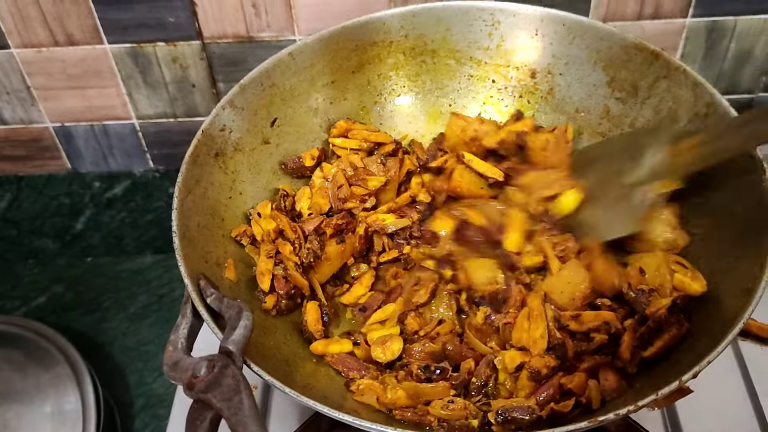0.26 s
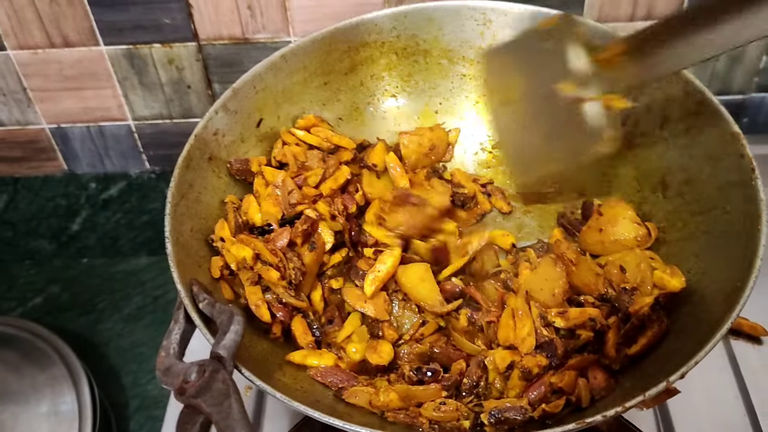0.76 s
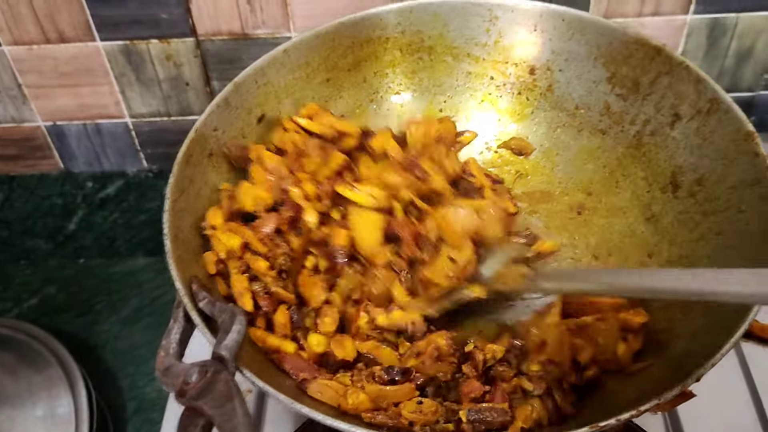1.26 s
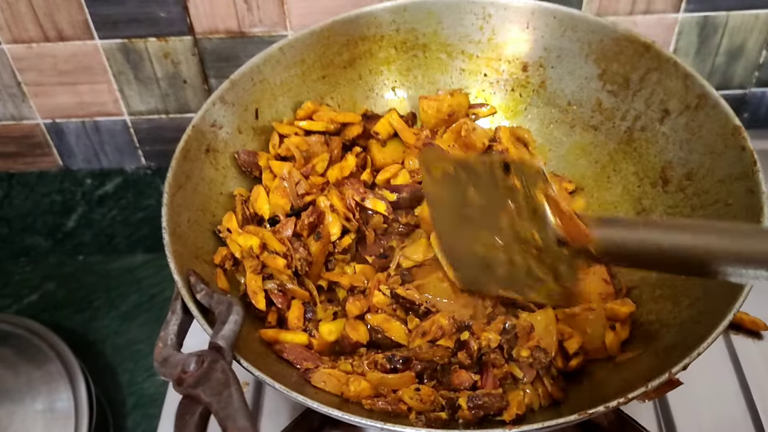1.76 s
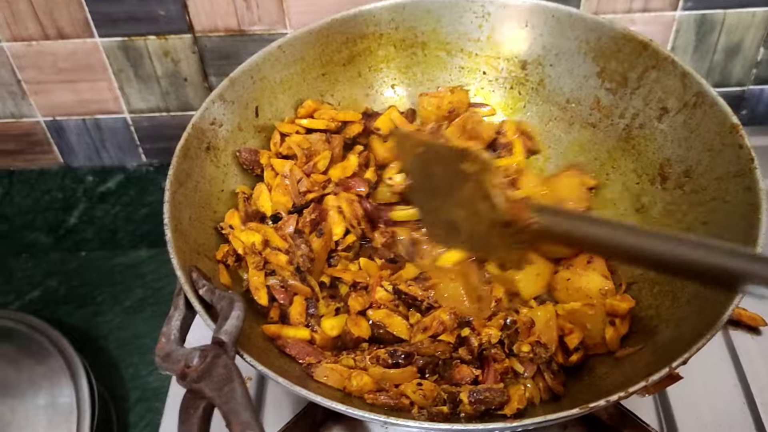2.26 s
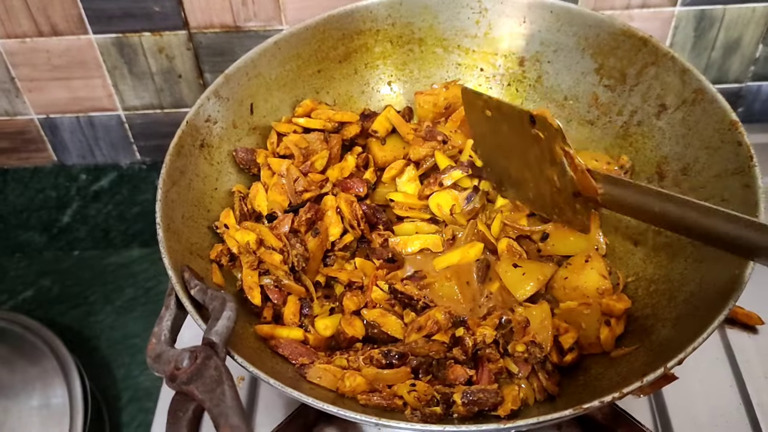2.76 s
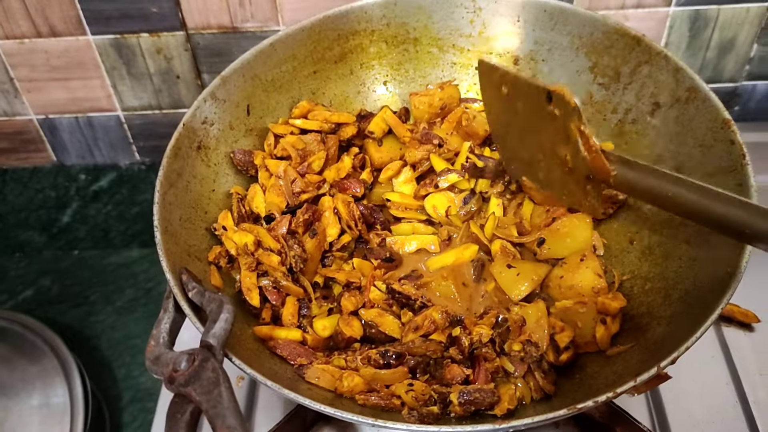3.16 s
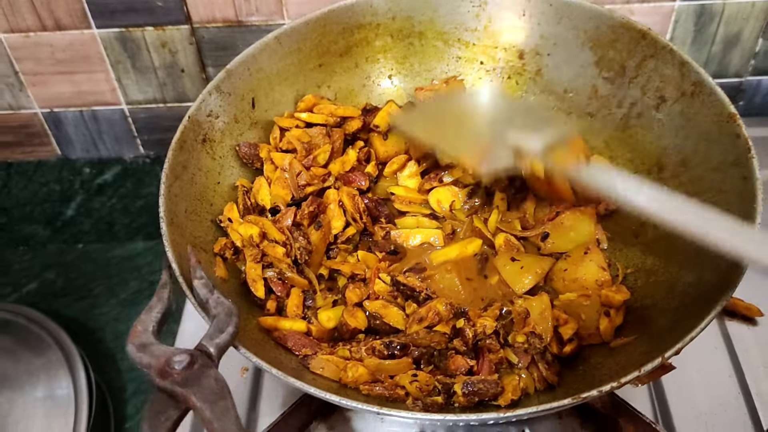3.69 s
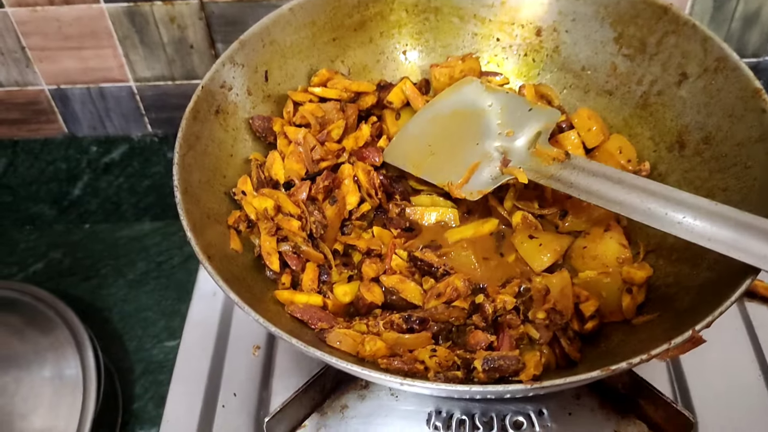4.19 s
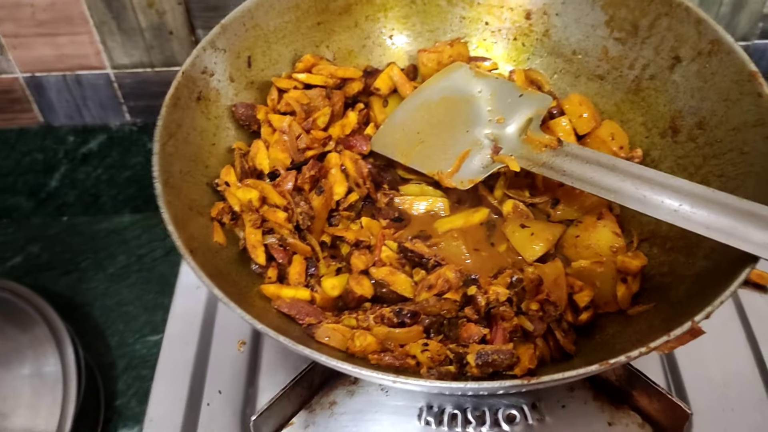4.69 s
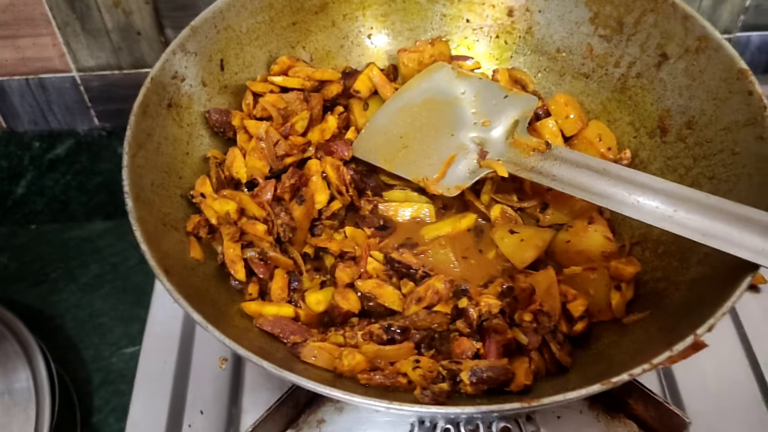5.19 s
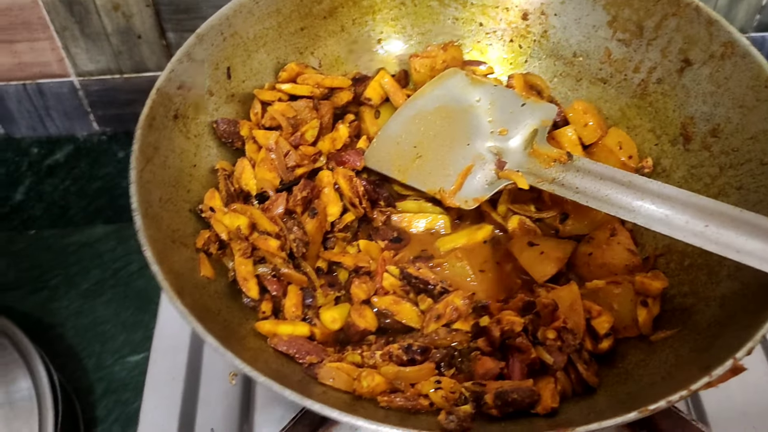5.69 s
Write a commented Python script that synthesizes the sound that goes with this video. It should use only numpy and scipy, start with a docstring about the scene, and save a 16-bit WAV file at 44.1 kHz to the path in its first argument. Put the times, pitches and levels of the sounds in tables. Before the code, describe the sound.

A hissing, crackling boil opens strongly, flares again after a second and dries away over a soft low flame. Squelchy stirring and hard spatula knocks come first, then one clear knock and the spatula set down in the wok. Metal tongs clank and land in a rough, ringing skid on a plate. Near microphone, short bright tiled-room reflections.

```python
"""Wet curry sizzles in a metal wok over a gas flame in a small tiled kitchen: filtered bursts and steady noise.
The boil flares twice and dies away into a simmer, which grows again near the end; a hollow drone swells at touches.
A steel spatula shoves the food, knocks the wok and is laid down in it: noise cracks excite damped modes.
Then the pan tongs clank twice and land with a ringing clatter on a steel plate: modes and grainy contact noise.
Two faint bright ticks of spitting fat, made like the knocks, come once amid the stirring and once at the end."""
import sys
import numpy as np
from scipy import signal
from scipy.fft import rfft, irfft, next_fast_len
from scipy.io import wavfile
from scipy.ndimage import uniform_filter1d

SR = 44100
rng = np.random.default_rng(int(sys.argv[2]) if len(sys.argv) > 2 else 0)


def pcm_store(signal):
    """Save signal as 16-bit PCM."""
    levels = np.round(np.clip(np.atleast_2d(signal), -1, 1) * 32767)
    wavfile.write(sys.argv[1], SR, levels.astype(np.int16).T)


N = 261954
TIME = np.arange(N) / SR
BAND_LIMIT_HZ = 16000

# Boil flares as wet food is turned onto bare metal: start_s, length_s, relative level_db
FLARES = [(0.0, 0.22, -38.5), (1.13, 0.23, -42)]
FLARE_RISE_DB_PER_S, FLARE_FALL_DB_PER_S = 34, 88
DRYING_DB, DRYING_DB_PER_S = -40.5, 7  # boil between flares: relative level at the start, and fall as metal dries
BOIL_DB, CRACKLE_DB = 1, -11  # fine fizz and larger bubbles
# Spectrum of the boil: frequency_hz, relative level_db
BOIL_SPECTRUM = [(410, -7), (700, -36), (1560, -3), (1750, -6.5), (2080, -6.5), (2800, -2), (3030, -8),
                 (3790, 1), (5540, -5.5), (6150, -3), (7790, -5), (8880, 0.5), (9860, -1), (10800, 4.5),
                 (16000, 0.5)]
# Course of the quiet frying underneath: time_s, relative level_db
SIMMER_COURSE = [(1.9, -55.5), (4.78, -54), (5.69, -51.5), (5.94, -47)]
SIMMER_DB = 3.5  # added to that course
# Spectrum of the frying: frequency_hz, relative level_db
SIMMER_SPECTRUM = [(350, -40), (600, 1), (906, -1.5), (997, 1.5), (1100, -4), (1310, -1.5), (2120, -4),
                   (2830, -5.5), (3250, -2.5), (4910, -4.5), (6640, -5), (7620, -10), (8860, -2.5),
                   (12000, 2), (16000, -3.5)]

FLAME_DB = -55
# Spectrum of the gas flame: frequency_hz, relative level_db
FLAME_SPECTRUM = [(25, -37), (50, -19), (75, -4), (105, 4), (130, 2.5), (160, -3.5), (235, -1.5),
                  (265, -1.5), (302, -4.5), (355, -11), (420, -4.5), (520, -14.5), (900, -24), (2000, -45)]

HOLLOW_DB = -62  # the drone at rest
# Swells of the hollow drone as cookware is handled: start_s, length_s, level_db
SWELLS = [(0.28, 0.092, -47), (1.1, 0.2, -53.5), (1.74, 0.044, -58), (3.24, 0.15, -53), (3.65, 0.077, -59),
          (3.785, 0.033, -46.5), (4.04, 0.018, -46.5), (4.32, 0.037, -47), (4.44, 0.026, -49.5),
          (5.13, 0.025, -48.5)]
SWELL_RISE_DB_PER_S, SWELL_FALL_DB_PER_S = 247, 107
# Spectrum of the hollow drone: frequency_hz, relative level_db
HOLLOW_SPECTRUM = [(100, -27), (200, -23), (245, -7), (268, -17.5), (306, 1.5), (335, -14), (375, -25),
                   (422, -13), (500, -26.5), (1000, -49)]

# Wet food shoved across the wok: start_s, length_s, level_db
SHOVES = [(0.02, 0.39, -51.5), (0.28, 0.18, -43), (0.48, 0.06, -46.5), (0.615, 0.026, -47),
          (1.08, 0.31, -54), (1.56, 0.089, -58.5), (3.232, 0.017, -52), (3.805, 0.074, -47.5)]
SHOVE_RISE_DB_PER_S, SHOVE_FALL_DB_PER_S = 346, 169
# Spectrum of the shoved food: frequency_hz, relative level_db
SHOVE_SPECTRUM = [(120, -57), (200, -17), (301, 0), (491, -9.5), (631, -10), (900, -13.5), (1550, -13),
                  (1740, -7.5), (2020, -20), (2300, -18), (3500, -15), (4550, -47), (7700, -79)]
# Blade sliding on the wok, twice under the food and again before release: start_s, length_s, level_db
SLIDES = [(0.339, 0.0082, -38.5), (0.376, 0.015, -33.5), (3.825, 0.022, -40)]
SLIDE_RISE_DB_PER_S, SLIDE_FALL_DB_PER_S = 190, 1100
# Spectrum of the sliding steel: frequency_hz, relative level_db
SLIDE_SPECTRUM = [(1180, -12), (2000, -15), (4150, -3.5), (4410, -10), (4860, -6.5), (11900, -1),
                  (14800, -8), (16000, -17)]

# Knocks of the utensils, and two faint bright ticks of spitting fat (at 2.582 and 5.783 s):
# start_s, relative strength_db, brightness_db_per_octave, boom_db, left_minus_right_db,
# relative room_db, name of the part that rings
KNOCKS_AND_TICKS = [(0.263, -41.5, 1.5, 7.5, -1, -7, "none"), (0.322, -48, 3.5, 2, 2, -10, "none"),
                    (0.372, -48, -5.5, -12, -7, -3, "none"), (0.449, -31.5, 0, 0.5, 1, -4, "none"),
                    (0.517, -37.5, 0.5, -10, -2, -7, "edge"), (0.599, -38.5, -3, 7.5, 0.5, -6, "none"),
                    (1.003, -35.5, 6, -2.5, -0.5, 6, "blade"), (1.615, -52, 0, -12, 0, -12, "none"),
                    (1.637, -33.5, 1.5, 6, -1.5, -8, "rim"), (2.241, -55, -1.5, -2, 0, -4, "none"),
                    (2.582, -58, 7.5, -12, 4, -10, "none"), (3.063, -28, 1.4, 6, 2, -7, "wall"),
                    (3.234, -55, -6.5, 10, -1.5, 3, "none"), (3.249, -60, -3, 7, 0, -12, "none"),
                    (3.837, -25, -0.5, 1.5, 0, -1.5, "handle"), (3.899, -37, -3.5, 5.5, 0, 4, "none"),
                    (3.931, -37, -4.5, 8, 3, -10, "none"), (4.672, -57.5, -8.5, 17, -1, -11, "none"),
                    (4.826, -29, 3.5, 11, -1, -6.5, "hinge"), (4.901, -23, 0, 0, 0, -7.5, "tongs"),
                    (5.353, -30, 2, 6, -4, 0, "none"), (5.362, -36, 3.5, 4, -8, -9, "none"),
                    (5.370, -20, 1.5, 9, 6, -10.5, "plate"), (5.388, -29.5, 4.5, 1.5, -7, -3, "skid"),
                    (5.398, -25, -5, -2.5, 1, -5, "plate"), (5.414, -33.5, -0.5, -2, 17, -5, "skid"),
                    (5.427, -28.5, 4.5, 4.5, 1, -4.5, "skid"), (5.445, -26.5, -0.5, 5, 5, -11.5, "skid"),
                    (5.459, -27.5, 0, -1, -5.5, -4.5, "plate"), (5.527, -41, -1, 1, 6, -4, "none"),
                    (5.562, -46, -2, -24, -2, 1, "none"), (5.783, -54, 6.5, -5, -9, -11, "none")]
# Edges of the bands that shape a knock or tick: frequency_hz
KNOCK_BANDS = [180, 500, 1200, 2600, 6500, 13000]
BRIGHTNESS_PIVOT_HZ = 2000
# Low hollow resonances of the room, under every knock and tick: frequency_hz, relative level_db, t60_s
LOW_BOOM = [(247, -1, .35), (303, 1, .45), (418, -4, .4), (560, -12, .3), (614, -12, .3), (810, -12, .3)]
# Modes of the edge: frequency_hz, relative level_db, t60_s
EDGE = [(3210, -4, .12), (3396, 0, .15), (3520, -5, .12), (4410, -7, .12)]
# Modes of the spatula blade: frequency_hz, relative level_db, t60_s
BLADE = [(hz, db, .24) for hz, db in [(2618, -50), (3497, -49), (3920, -52), (4130, -51), (4700, -50),
         (4929, -50), (5126, -49), (6169, -50), (6320, -52), (6568, -49), (6708, -49), (7350, -48),
         (7720, -47), (8269, -47), (8480, -47), (8678, -44), (9076, -50), (9380, -47), (9878, -48),
         (10051, -50), (10401, -44), (10756, -50), (10815, -43), (11057, -48), (11353, -47), (11644, -46),
         (11962, -51), (12306, -41), (12812, -47), (13650, -52), (14298, -53)]]
# Modes of the rim: frequency_hz, relative level_db, t60_s
RIM = [(608, 1, .25), (711, 0, .25), (767, -2, .25), (1241, -1, .22), (1335, -1, .45), (1980, -6, .12),
       (4111, -5, .25), (6115, -9, .2), (6799, -8, .2)]
# Modes of the wall: frequency_hz, relative level_db, t60_s
WALL = [(300, -1, .33), (875, -5, .25), (1130, -2, .22), (1440, 9, .06), (1620, 9, .06), (1530, 2, .18),
        (1790, -1, .22), (2430, -3, .24), (2700, -5, .18), (3960, -7, .16), (4680, -6, .18),
        (4970, -8, .18)]
# Shorter modes sounding with the handle: frequency_hz, relative level_db, t60_s
SHAFT = [(hz, db, .22) for hz, db in [(1060, -6), (1115, -6), (1705, 0), (1779, -4), (2464, -9), (3085, -9),
         (3450, -6), (3531, -2), (3630, -3), (4059, -8), (4350, -4), (4470, -3), (4890, -2), (5125, -8),
         (5310, -9), (5803, -4), (6280, -9), (6550, -9), (6820, -8), (7956, -8), (9026, -9), (10250, -12)]]
# Long modes of the handle: frequency_hz, relative level_db, t60_s
HANDLE = [(1927, 0, .9), (2557, -7.5, .75), (3262, -10.5, .65)]
# Modes of the hinge: frequency_hz, relative level_db, t60_s
HINGE = [(247, 3, .4), (412, 2, .4), (2850, -6, .2), (4200, -5, .2), (4600, -5, .2), (7650, -3, .2),
         (8020, -5, .2), (9000, -5, .2), (11200, -1, .2), (11650, -3, .2)]
# Modes of the pan tongs: frequency_hz, relative level_db, t60_s
TONGS = [(hz, db, .25) for hz, db in [(412, 0), (723, 0), (792, -1), (831, 1), (894, -3), (1300, -6),
         (2270, -10), (2830, -5), (3204, -1), (3310, -3), (3420, -3), (3725, 1), (3830, 0), (3960, -3),
         (4170, -3), (5050, -9), (8600, -7), (8945, -3)]]
# Modes of the plate's floor: frequency_hz, relative level_db, t60_s
PLATE_FLOOR = [(hz, db, .3) for hz, db in [(247, 3), (298, 7), (471, -1), (559, 1), (616, 1), (808, -3),
               (865, -2), (1211, -6), (1265, -6), (1553, 0), (1758, -4), (1819, -5), (2374, -6), (2873, -5),
               (3397, -6), (3608, -5), (3745, -4), (3850, -3), (4204, -6), (4430, -4), (4756, -3),
               (5185, -2), (5771, -1), (5850, -4), (6169, -8), (6750, -6)]]
# Modes of the plate's rim: frequency_hz, relative level_db, t60_s
PLATE_RIM = [(hz, db, .35) for hz, db in [(2875, -49), (4756, -44), (5771, -41), (7302, -47), (7811, -50),
             (8376, -43), (8424, -34), (9256, -40), (10471, -49), (10756, -49), (11265, -45), (11418, -42),
             (11658, -40), (13318, -38), (13641, -50), (14180, -48), (15673, -43)]]
# Response of each named part to a knock: ring_against_strength_db, line_blur_hz, beating_depth (no unit), modes
RINGS = {"none": [], "edge": [(0, 60, 1, EDGE)], "blade": [(15.5, 24, 0.9, BLADE)],
         "rim": [(-5, 42, 1, RIM)], "wall": [(4, 99, 1, WALL)], "handle": [(3, 32, 0.9, SHAFT),
         (-10, 8, .15, HANDLE)], "hinge": [(-8, 87, 0.93, HINGE)], "tongs": [(-1, 128, 0.86, TONGS)],
         "skid": [(3.6, 23, 0.76, PLATE_FLOOR)], "plate": [(5, 16, 0.5, PLATE_RIM)]}

# Tongs grazing the plate, then chattering between bounces: start_s, length_s, level_db
CHATTER = [(5.346, 0.011, -40.5), (5.376, 0.088, -23.5)]
CHATTER_RISE_DB_PER_S, CHATTER_FALL_DB_PER_S = 1204, 403
# Spectrum of the chatter: frequency_hz, relative level_db
CHATTER_SPECTRUM = [(90, -51), (150, -24), (240, 1.5), (268, -7), (298, 7.5), (350, -16), (470, 3),
                    (590, 3), (960, -8), (6400, -12), (7600, -24), (10000, -23), (11500, -9), (12800, -13),
                    (16000, -58)]
RIPPLE_HZ = 5000  # the ripple of steel spectra reaches full depth here

# Reverberation of the kitchen: frequency_hz, t60_s
KITCHEN = [(150, 0.17), (300, 0.36), (1000, 0.41), (3000, 0.35), (8000, 0.34), (15000, 0.18)]
# Stereo width: frequency_hz, side_against_mid_db
WIDTH = [(40, -9), (110, -17), (250, -15), (500, -4), (1000, 0), (16000, 0)]
# Notches and peaks of the microphone ports: frequency_hz, gain_db
PORTS = [(4900, 1), (5300, 0.5), (5700, 1), (6200, 3), (6800, 2.5), (7250, -1), (7900, 4), (8800, 5.5),
         (9900, 0), (11800, 3), (13200, -2.5)]
# Balance of the two microphone ports: frequency_hz, left_minus_right_db
LEAN = [(100, 0), (6500, -0.5), (7500, -3), (8600, -10.5), (9300, -6.5), (9900, 1), (11100, 13),
        (11800, 9.5), (12400, 7), (13200, 4), (16000, 4)]


def amp(db):
    """Logarithmic level law: decibels to amplitude gain."""
    return 10 ** (np.asarray(db) / 20)


def evened(x):
    """Power normalisation: scales to rms 1."""
    return x / np.sqrt(np.mean(x ** 2) + 1e-20)


def read(points, hz):
    """Logarithmic frequency scale: interpolates a spectrum table along it."""
    table_hz, value = np.transpose(points)
    return np.interp(np.log(hz + 1), np.log(table_hz + 1), value)


def level(rows, rise_db_per_s, fall_db_per_s):
    """Exponential growth and decay: each row swells up to its start, holds and dies away; powers add."""
    power = np.zeros(N)
    for start_s, length_s, db in rows:
        early_s = np.maximum(start_s - TIME, 0)
        late_s = np.maximum(TIME - start_s - length_s, 0)
        power += amp(db - rise_db_per_s * early_s - fall_db_per_s * late_s) ** 2
    return np.sqrt(power)


def add(mix, start_s, sound):
    """Superposition: mixes a stereo sound in at its start time."""
    part = mix[:, max(round(start_s * SR), 0):][:, :sound.shape[1]]
    part += sound[:, :part.shape[1]]


def colour(x, points, size=4096):
    """Minimum-phase filtering: a causal response is built from the spectrum by the Hilbert transform."""
    log_gain = np.log(amp(read(points, abs(np.fft.fftfreq(size, 1 / SR)))))
    response = np.exp(np.conj(signal.hilbert(log_gain)))
    taps = np.fft.ifft(response).real[:size // 2]
    return signal.oaconvolve(x, taps[None], axes=1)[:, :x.shape[1]]


def spread(pair):
    """Interchannel coherence: two unrelated signals become a stereo pair whose bass is nearly mono."""
    mid, side = pair[:1], colour(pair[1:], WIDTH)
    return np.vstack([mid + side, mid - side]) / np.sqrt(2)


def drift(shape, hz):
    """Band-limited random motion: rms 1 taken over the whole array, no faster than about hz."""
    smooth = np.exp(-(np.fft.rfftfreq(shape[-1], 1 / SR) / hz) ** 2)
    spectrum = rfft(rng.standard_normal(shape)) * smooth
    return evened(irfft(spectrum, shape[-1]))


def tail(count=20480):
    """Diffuse reverberation: dense reflections from the tiles, each band decaying at its own speed."""
    noise = spread(rng.standard_normal((2, count)))
    hz, t, bands = signal.stft(noise, SR, nperseg=256)
    decaying = bands * amp(-60 * t / read(KITCHEN, hz)[:, None])
    return signal.istft(decaying, SR, nperseg=256)[1][:, :count]


def in_room(x, wet_db):
    """Direct and reverberant fields: adds reflections while keeping the expected power."""
    echo = tail()
    wet = signal.fftconvolve(x, echo / np.linalg.norm(echo[0]), axes=1)[:, :N]
    return (x + amp(wet_db) * wet) / np.hypot(1, amp(wet_db))


def pops(per_s, spread_db, ring_s, count=300):
    """Random impulse process: tiny noise bursts, mostly small and a few large, timed alike in both channels."""
    happens = rng.random(N) < per_s / SR
    sizes = amp(spread_db * np.minimum(rng.exponential(1, N), 5)) * happens
    power_decay = np.exp(-np.arange(count) / (ring_s * SR))
    power = signal.oaconvolve(sizes ** 2, power_decay)[:N]
    return evened(np.sqrt(abs(power)) * rng.standard_normal((2, N)))


def grainy(gain, spectrum, per_s, spread_db, ring_s, wet_db, surge_db, surge_hz=30):
    """Modulated shot noise: a surging stream of bursts takes a spectrum and a gain, then room reflections."""
    bursts = pops(per_s, spread_db, ring_s) * amp(surge_db * drift((N,), surge_hz))
    dry_grains = evened(colour(spread(bursts), spectrum)) * gain
    return in_room(dry_grains, wet_db)


def steel_colour(shape, width_hz=45, range_db=12, count=110):
    """Modal density: many damped resonances of thin steel break up a spectrum, drawn anew for each contact."""
    hz = np.geomspace(20, 17000, 1800)
    peaks_hz = (np.arange(count) + rng.random(count))[:, None] * BAND_LIMIT_HZ / count
    heights = amp(-range_db * rng.random((count, 1)) ** 2)
    power = (heights ** 2 / (1 + ((hz - peaks_hz) / width_hz) ** 2) ** 2).sum(0)
    ripple_db = 10 * np.log10(power / np.average(power, weights=hz) + .05)
    return np.column_stack([hz, read(shape, hz) + ripple_db * np.clip(hz / RIPPLE_HZ, 0, 1)])


def sizzle():
    """Bubble acoustics: steam bursts fiercely where wet food meets bare metal, gently elsewhere; large ones crackle."""
    flaring = level(FLARES, FLARE_RISE_DB_PER_S, FLARE_FALL_DB_PER_S)
    boiling = np.hypot(flaring, amp(DRYING_DB - DRYING_DB_PER_S * TIME))
    frying = amp(SIMMER_DB + np.interp(TIME, *np.transpose(SIMMER_COURSE)))
    boil = grainy(boiling, BOIL_SPECTRUM, per_s=2600, spread_db=3.3, ring_s=.0003, wet_db=0, surge_db=1.8)
    crackle = grainy(boiling, BOIL_SPECTRUM, per_s=70, spread_db=2.6, ring_s=.0012, wet_db=-4, surge_db=1)
    simmer = grainy(frying, SIMMER_SPECTRUM, per_s=8800, spread_db=3.0, ring_s=0.00018, wet_db=6, surge_db=1.9)
    return amp(BOIL_DB) * boil + amp(CRACKLE_DB) * crackle + simmer


def flame():
    """Turbulent combustion noise: a soft, steady roar of filtered noise."""
    noise = spread(rng.standard_normal((2, N)))
    return amp(FLAME_DB) * evened(colour(noise, FLAME_SPECTRUM))


def handling():
    """Resonant filtering of noise: a faint hollow drone swells when the cookware is touched or shifted."""
    swelling = np.hypot(amp(HOLLOW_DB), level(SWELLS, SWELL_RISE_DB_PER_S, SWELL_FALL_DB_PER_S))
    noise = spread(rng.standard_normal((2, N)))
    return swelling * evened(colour(noise, HOLLOW_SPECTRUM, size=8192))


def stirring():
    """Friction noise: sticky squelches of food, and the fine slips of steel on the wok."""
    pushing = level(SHOVES, SHOVE_RISE_DB_PER_S, SHOVE_FALL_DB_PER_S)
    out = grainy(pushing, SHOVE_SPECTRUM, per_s=340, spread_db=2.1, ring_s=0.0014, wet_db=-3, surge_db=2)
    for stroke in SLIDES:
        pressing = level([stroke], SLIDE_RISE_DB_PER_S, SLIDE_FALL_DB_PER_S)
        steel = steel_colour(SLIDE_SPECTRUM)
        out += grainy(pressing, steel, per_s=1000, spread_db=3.2, ring_s=.0005, wet_db=-2, surge_db=.5)
    return out


def contact(brightness_db, boom_db, tick_db=-2.0):
    """Contact stiffness: a harder contact tilts the bands to the treble; the lowest band is the hollow boom."""
    edges = np.array(KNOCK_BANDS)
    octaves = np.log2(np.sqrt(edges[2:] * edges[1:-1]) / BRIGHTNESS_PIVOT_HZ)
    *middle, top = brightness_db * octaves
    return np.array([boom_db, *middle, top + tick_db])


def favoured(shape, table, width_hz=130, lift_db=10, size=220):
    """Resonant response: a knock is loudest near the struck part's modes, at about equal local power."""
    hz = np.geomspace(20, 17000, 1800)
    near = np.zeros(len(hz))
    top_db = max([db for _, db, _ in table], default=0)
    for mode_hz, db, _ in table:
        width = min(width_hz, mode_hz / 16)
        near = np.maximum(near, amp((db - top_db) / 2) / (1 + ((hz - mode_hz) / width) ** 2))
    power = amp(lift_db * near) ** 2
    return np.column_stack([hz, read(shape, hz) + 10 * np.log10(power / uniform_filter1d(power, size))])


def modes(table, blur_hz, beating, count=32768):
    """Modal decay: damped sines beat through random drifts, as close pairs and reflections make them do."""
    t = np.arange(count) / SR
    hz, db, t60 = np.transpose(table)[:, :, None]
    size = (2, len(table), count)
    start_phase = rng.random((2, len(table), 1))
    phase = 2 * np.pi * (hz * t + start_phase) + 1.5 * beating * drift(size, blur_hz)
    ring = amp(db - 60 * t / t60 + 5.05 * beating * drift(size, blur_hz)) * np.sin(phase)
    onset = 1 - np.exp(-t / 0.00029)
    return spread(ring.sum(1)) * np.sqrt(2) / np.linalg.norm(amp(db)) * onset


def knock(db, bands_db, room_db, part_modes, crack_s=0.0026, rise_s=0.0044, bloom_s=0.0016, boom_s=0.016,
          crack_db=12, ring_db=-3):
    """Impulsive excitation: a broad crack of milliseconds, its rippled reverberation, and the room's low modes."""
    echo = tail()
    t = np.arange(echo.shape[1]) / SR
    edges = np.array(KNOCK_BANDS)
    density_db = bands_db + 10 * np.log10(SR / 2 / np.diff(edges))  # band power to power per hertz
    centres = np.sqrt(edges[1:] * edges[:-1])
    low_db, high_db = density_db[0], density_db[-1]
    bass = [(40, low_db - 56), (110, low_db - 32), (165, low_db - 14.5), (215, low_db - 4.5)]
    top = [(12500, high_db + 5.0), (16000, high_db - 1.0)]
    # the low boom, with a dip above
    hollow = [(centres[0], low_db - 0.5), (470, (low_db + density_db[1]) / 2 - 3.0)]
    shape = favoured([*bass, *hollow, *zip(centres[1:], density_db[1:]), *top], part_modes)
    crack = spread(rng.standard_normal(echo.shape)) * np.exp(-t / crack_s) * (1 - np.exp(-t / rise_s))
    ring = colour(echo * (1 - np.exp(-t / bloom_s)), steel_colour(shape))
    low_ring = modes(LOW_BOOM, blur_hz=11.3, beating=0.93, count=len(t)) * (1 - np.exp(-t / boom_s))
    boom = amp(bands_db[0] - 0.5) * low_ring
    return amp(db) * (amp(crack_db) * colour(crack, shape) + amp(room_db + ring_db) * (ring + boom))


def knocks_and_ticks(lag_s=0.0015):
    """Forced, then free vibration: utensil knocks, steel ringing after the cleanest, and two ticks of spitting fat."""
    out = np.zeros((2, N))
    for start_s, db, brightness_db, boom_db, pan_db, room_db, part in KNOCKS_AND_TICKS:
        part_modes = [mode for *_, table in RINGS[part] for mode in table]
        impulse = knock(db, contact(brightness_db, boom_db), room_db, part_modes)
        add(out, start_s, impulse * amp([[pan_db / 2], [-pan_db / 2]]))
        for ring_db, blur_hz, beating, table in RINGS[part]:
            longest_s = max(t60 for _, _, t60 in table)
            count = 2 * next_fast_len(int(longest_s * SR / 2))
            ring = modes(table, blur_hz, beating, count=count)
            add(out, start_s + lag_s, amp(db + ring_db) * ring)
    return out


def clatter():
    """Repeated micro-impacts: the tongs graze the plate, then skid in a rough run of tiny contacts."""
    skidding = level(CHATTER, CHATTER_RISE_DB_PER_S, CHATTER_FALL_DB_PER_S)
    steel = steel_colour(CHATTER_SPECTRUM, width_hz=110, count=90)
    return grainy(skidding, steel, per_s=320, spread_db=2.1, ring_s=0.0008, wet_db=-3, surge_db=0.5)


def scene():
    """Superposition: stove and utensils together."""
    return sizzle() + flame() + handling() + stirring() + knocks_and_ticks() + clatter()


def record(dry):
    """Transducer response: each microphone port colours the sound in its own way; then the band limit."""
    hz = np.fft.rfftfreq(N, 1 / SR)
    lean = amp(np.array([[.5], [-.5]]) * read(LEAN, hz))
    ports = amp(read(PORTS, hz)) * lean / np.sqrt(np.mean(lean ** 2, axis=0))
    heard = irfft(rfft(dry) * ports, N)
    lowpass = signal.firwin(511, BAND_LIMIT_HZ, window=("kaiser", 9), fs=SR)
    return signal.oaconvolve(heard, lowpass[None], "same")


dry = scene()
out = record(dry)
pcm_store(out)
```